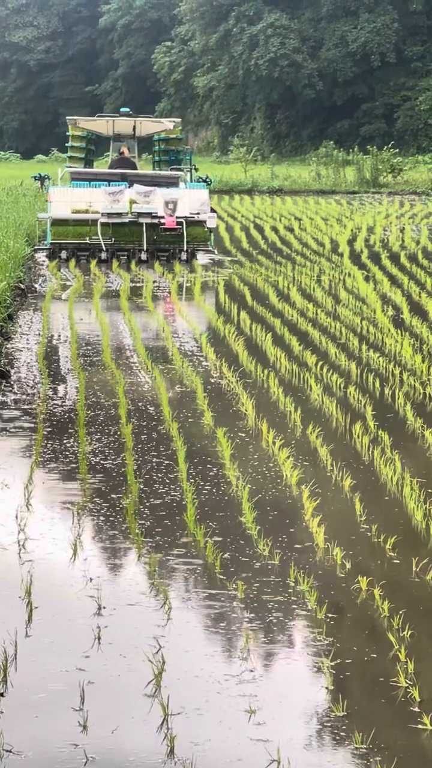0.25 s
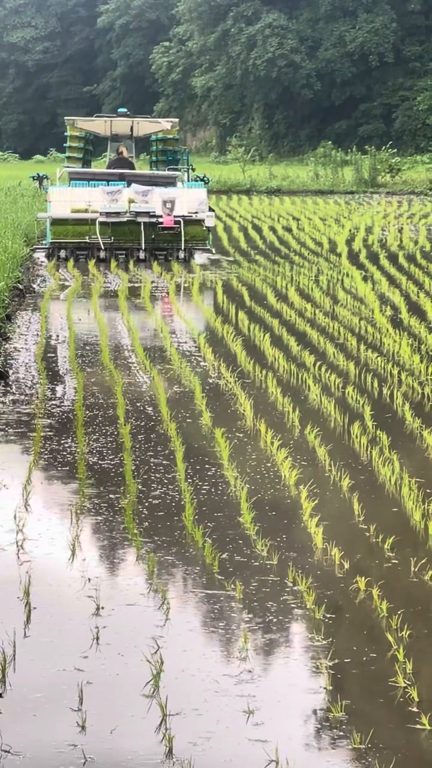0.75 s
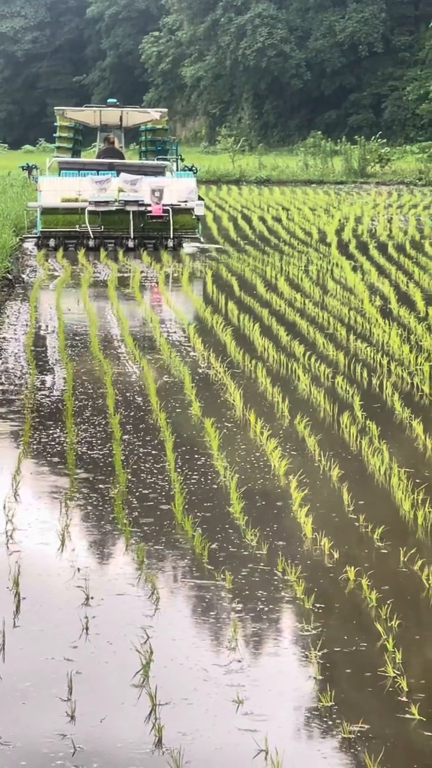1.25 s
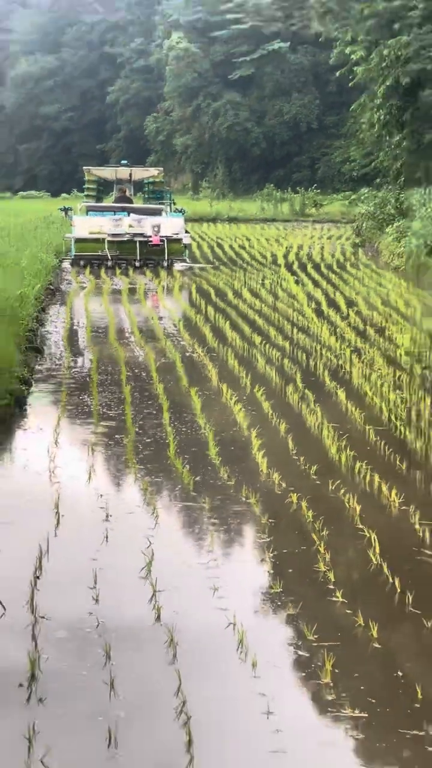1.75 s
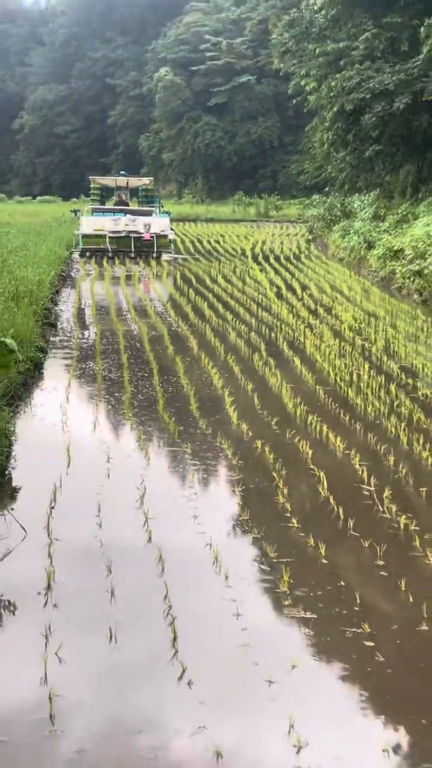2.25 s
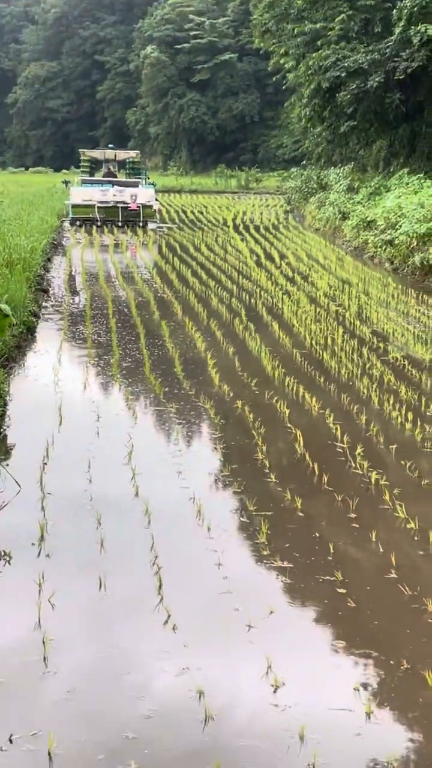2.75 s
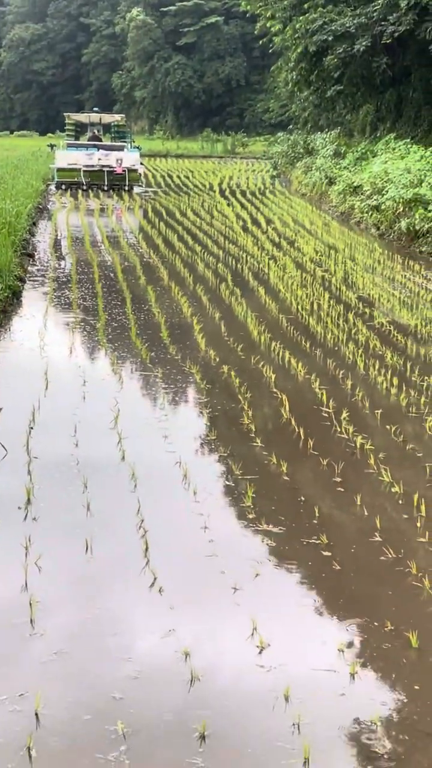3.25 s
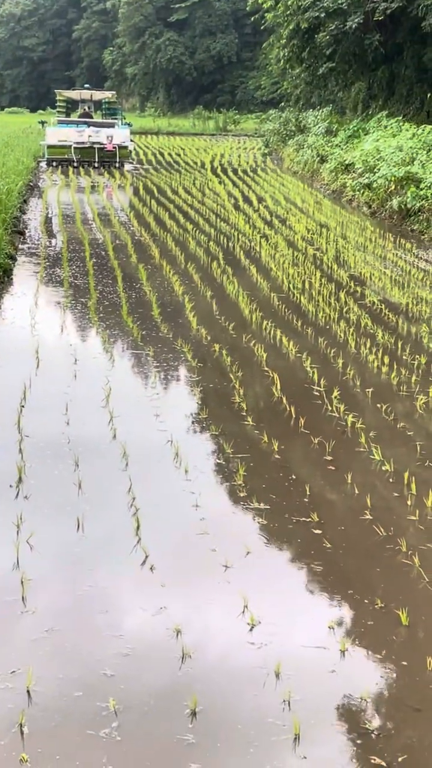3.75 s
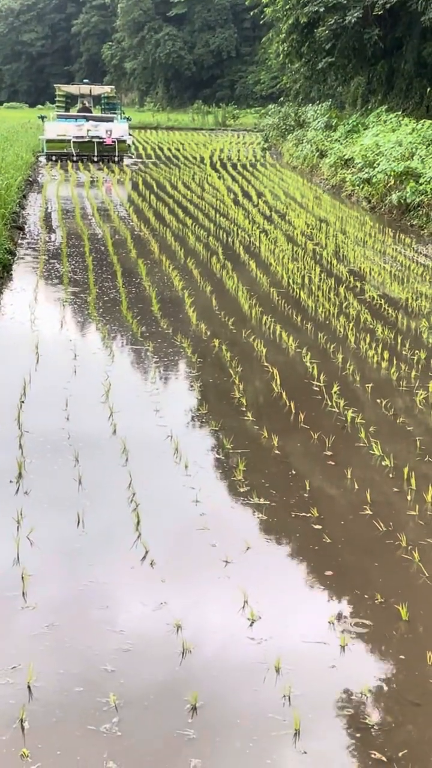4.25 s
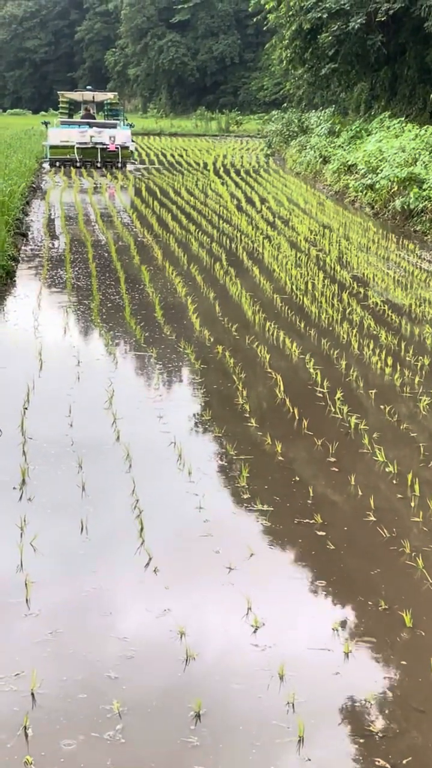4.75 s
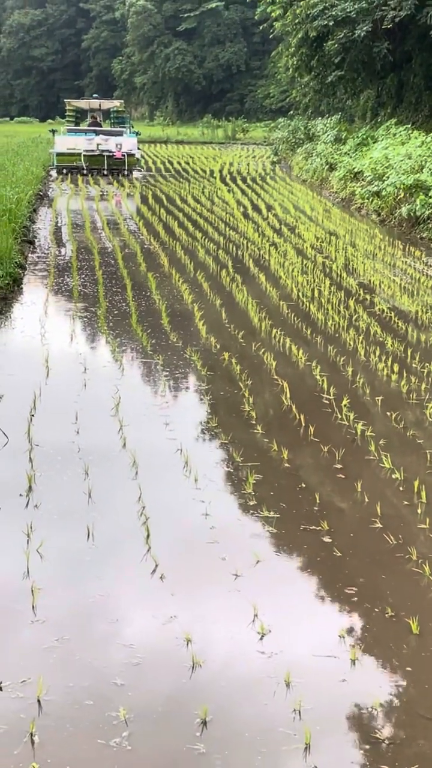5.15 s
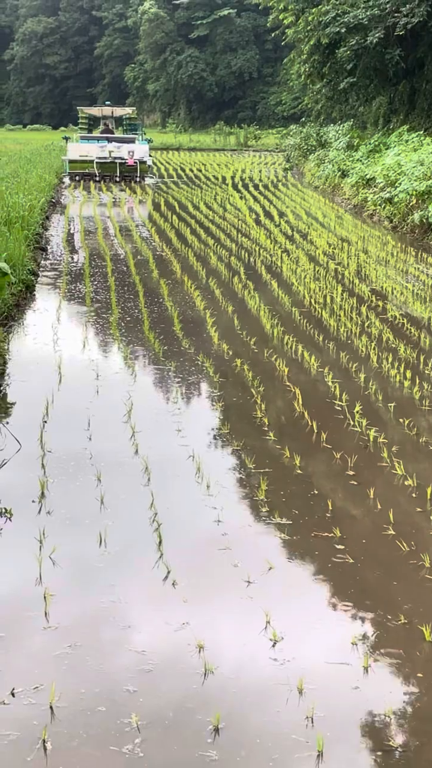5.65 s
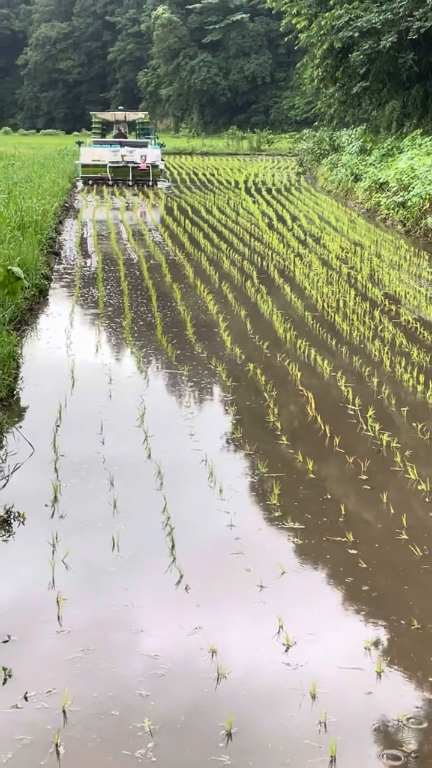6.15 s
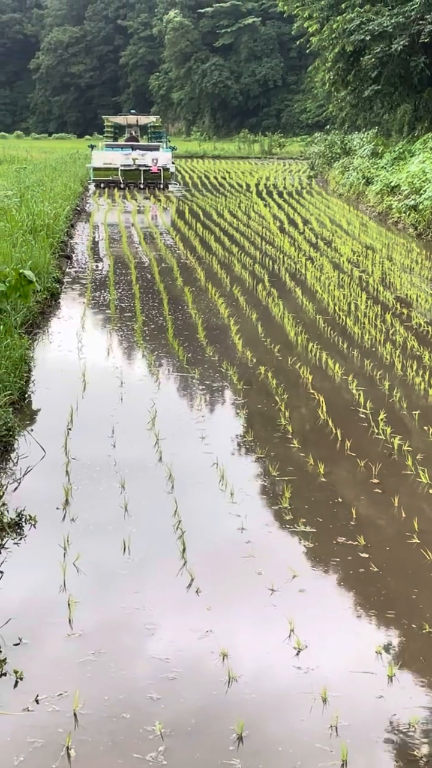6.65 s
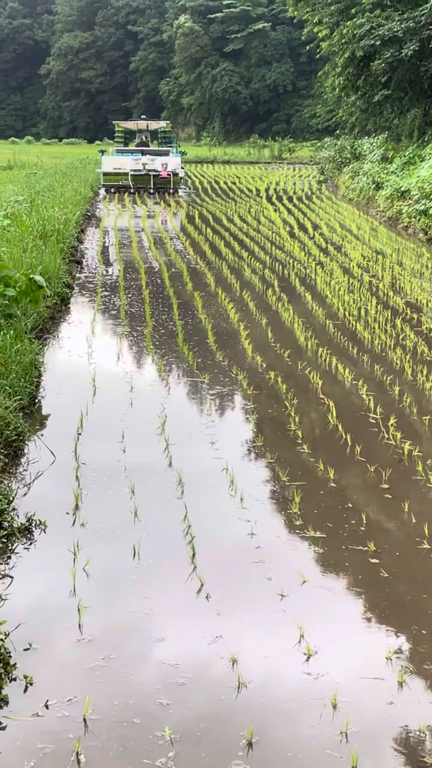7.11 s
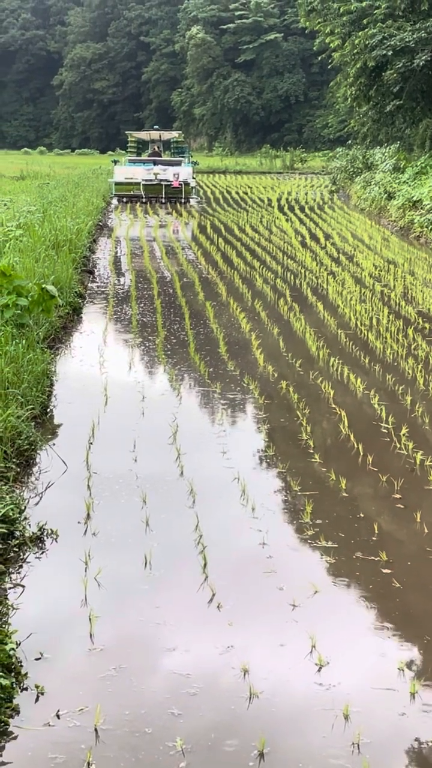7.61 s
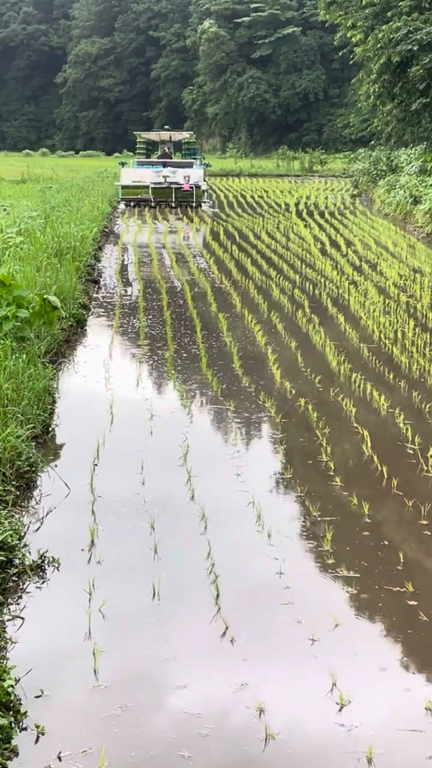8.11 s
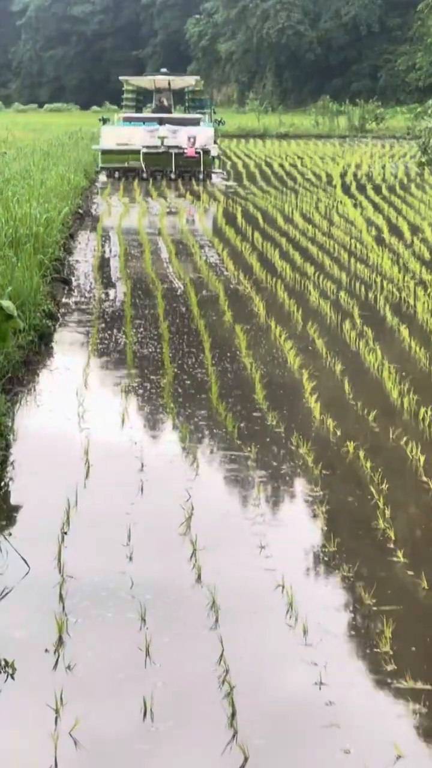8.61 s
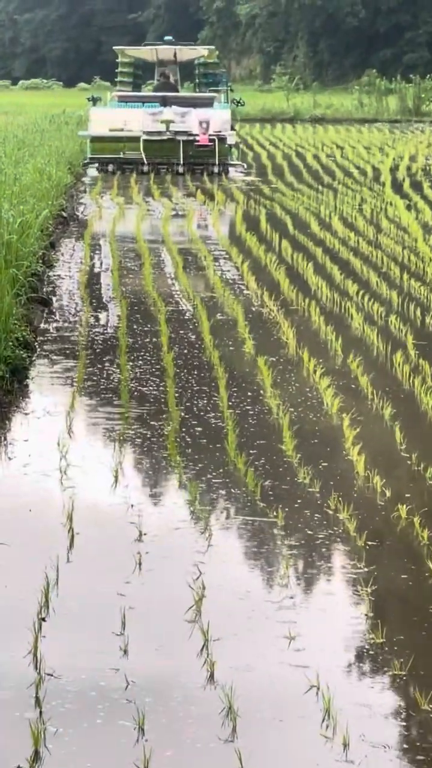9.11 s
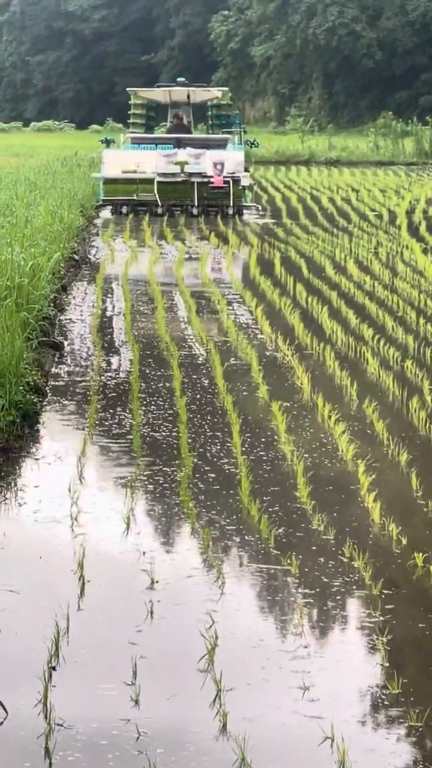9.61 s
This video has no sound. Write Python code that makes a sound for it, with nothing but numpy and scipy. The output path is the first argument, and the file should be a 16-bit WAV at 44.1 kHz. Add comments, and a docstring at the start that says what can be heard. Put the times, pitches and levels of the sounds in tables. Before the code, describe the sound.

A rice planter's diesel engine runs at a steady speed in a flooded field, with a droning exhaust, a rattling panel and a faint gear whine. It is loudest in the first two seconds, then eases off as it moves away, is faintest around 8 seconds and rises slightly at the end. Throughout, light rain hisses on the water, which churns and bubbles, with irregular small slaps of mud and sharp ticks of nearby drips. A bird whistles two quick phrases in the first second, with a slight echo, and returns more faintly between 7 and 8 seconds. The hand-held microphone gives a soft low rumble at the very start and a few fainter ones later. It takes a light knock at about 4.2 seconds, two louder dull knocks at 4.5 and 4.8, and another near 6.5 seconds.

```python
"""Planting rice in light rain

A rice transplanter crawls away through a flooded paddy: its three-cylinder diesel drones, a panel
rattles, gears whine and the planting tines slosh. Rain patters on the water and drips close by, and a
bird whistles from the wood behind the field. A hand-held camera takes a few soft knocks, and its two
microphone openings hear the treble out of step."""
import sys
import numpy as np
from scipy import signal
from scipy.fft import rfft, irfft, next_fast_len
from scipy.io import wavfile
from scipy.ndimage import uniform_filter1d, map_coordinates

SR = 44100
rng = np.random.default_rng(int(sys.argv[2]) if len(sys.argv) > 2 else 0)


def wrap_up_sound(samples):
    """Save the sound to the file named by the first command line argument, as 16-bit audio."""
    columns = np.atleast_2d(samples).T
    # keep every value between -1 and 1, then stretch to whole-number steps
    tamed = np.clip(columns, -1, 1)
    steps = np.round(tamed * 32767).astype(np.int16)
    wavfile.write(sys.argv[1], SR, steps)


N = 435266

# engine speed, sagging and recovering with the drag of the mud: t/s, firing rate/Hz
FIRING_RATE = [(0.05, 60.75), (0.77, 60.66), (1.01, 61.78), (1.43, 62.0), (2.33, 60.83), (3.59, 60.69),
               (3.89, 61.94), (4.07, 61.2), (4.31, 61.97), (4.79, 61.99), (5.15, 61.49), (5.45, 60.75),
               (5.69, 61.86), (6.11, 61.69), (6.41, 60.78), (7.07, 61.8), (7.25, 61.11), (7.43, 61.69),
               (8.81, 61.81), (9.05, 60.65), (9.29, 61.38), (9.77, 61.57)]
# exhaust drone, with three brief swells: t/s, level/dB
DRONE_LEVEL = [(0, -28), (.16, -26), (.26, -32.5), (.68, -35), (.9, -28), (1.0, -28), (1.08, -36),
               (1.65, -35.5), (2.45, -43.5), (3.3, -40), (3.77, -40), (3.92, -43), (4.7, -42), (5.4, -40.5),
               (5.75, -41.5), (5.88, -37), (6.08, -36), (6.16, -39), (7.67, -46.5), (9.05, -46),
               (9.3, -43.5), (9.87, -42.5)]
# throb at the firing rate: t/s, level/dB
THROB_LEVEL = [(0, -52), (.13, -39), (.22, -48), (.42, -52), (.55, -49), (1.2, -47), (1.7, -45), (1.9, -51),
               (2.2, -50), (2.85, -49), (3.55, -55), (4.2, -50), (5.25, -49), (5.4, -54), (6.1, -51),
               (6.75, -55), (7.6, -56), (8.3, -55), (8.6, -52), (9.03, -64), (9.29, -49), (9.45, -56),
               (9.87, -52)]
# how hard the machine works: t/s, exhaust bark/dB, machinery/dB
ENGINE_LOAD = [(0, -45.5, -47.5), (.45, -46.5, -49), (1.85, -48, -47.5), (2.15, -53.5, -49.5),
               (3.8, -54, -50.5), (4.9, -61, -51.5), (6.3, -56, -50.5), (6.85, -60, -53.5), (7.8, -63, -57),
               (8.65, -62.5, -55), (9.2, -57.5, -52.5), (9.87, -55, -50.5)]
# exhaust overtones: multiple of the three-firing cycle's rate, level against the bark/dB
OVERTONES = [(4, -29), (7, -12), (8, -14), (9, -1.5), (12, 0), (14, -10.5), (18, -8.5), (19, -9.5),
             (21, -6)]
# what the silencer lets through: f/Hz, level/dB
SILENCER_SPECTRUM = [(60, -29), (140, 0), (200, -3), (280, 0), (380, -0.5), (440, -4), (500, -8),
                     (620, -17.5), (1200, -19.5), (3000, -78)]
# rattling of a loose panel: t/s, level/dB
RATTLE_LEVEL = [(0, -41), (.4, -62), (1.1, -46.5), (1.85, -48), (2.25, -63), (3.7, -51.5), (4.9, -63),
                (6.3, -53), (6.8, -60), (8.68, -56), (8.83, -50.5), (9.05, -54), (9.55, -51.5), (9.87, -47)]
# tones the panel rings at: f/Hz, level/dB, time to fade by 60 dB/s
PANEL_TONES = [(332, -4, 0.062), (376.7, 0.5, 0.055), (427, -1.5, 0.066)]
# noise of the engine block and gearbox: f/Hz, level/dB
MACHINE_SPECTRUM = [(20, -17), (45, 0.5), (72, 8.5), (98, 5.5), (200, -7), (430, 5.5), (600, -2),
                    (750, 2.5), (1000, 0), (1400, -1), (2000, -11.5), (4000, -19), (16000, -57)]
# whine of the gears as their load shifts: t/s, slow gears/dB, fast gears/dB
WHINE_LEVEL = [(0, -59, -49.5), (.65, -59.5, -50), (1.0, -61.5, -46), (1.7, -62.5, -45.5), (2.05, -62, -51),
               (4, -63, -50.5), (4.9, -64, -53), (6.1, -63, -52.5), (6.5, -63, -50), (7.1, -68, -51.5),
               (7.8, -71, -55), (8.8, -70, -51), (9.87, -68, -50)]
# tones of the slow gears: multiple of the firing rate, level/dB
SLOW_GEAR_TONES = [(10.88, -0.8), (16.3, -2.5), (21.76, -0.5)]
# tones of the fast gears: multiple of the firing rate, level/dB
FAST_GEAR_TONES = [(27.31, -9), (33.05, -15), (44, -17)]
# churning water, with one short lull: t/s, level/dB
CHURN_LEVEL = [(0, -47.5), (3, -49), (7.25, -50), (7.8, -58), (8.2, -53.5), (8.8, -48.5), (9.87, -47.5)]
# water stirred by wheels and tines: f/Hz, level/dB
WASH_SPECTRUM = [(300, -50), (1000, -0.5), (1500, -5), (1800, 3), (2030, 2.5), (2250, 0.8), (2700, -1),
                 (4000, -7.5), (7000, -9), (16000, -67)]
# hiss of the rain: t/s, level/dB
RAIN_LEVEL = [(0, -51.5), (2.9, -49.5), (3.7, -48), (4.7, -52), (6.1, -49.5), (7.4, -51), (7.78, -53),
              (8.15, -48), (9.87, -54.5)]
# rain on water and leaves: f/Hz, level/dB
RAIN_SPECTRUM = [(200, -31), (900, -4.5), (2000, -1), (2900, 4.5), (4000, 2), (4800, -4), (5050, -1.5),
                 (5500, -1.5), (6200, -1.5), (7600, 0.5), (10300, -5), (12000, -5), (13800, -11),
                 (15800, -14)]
# drizzle on nearby grass, lifted by the ringing of the microphone openings: f/Hz, level/dB
DRIZZLE_SPECTRUM = [(4000, -35), (7000, -11.5), (8000, 3.5), (9000, 5.5), (10200, -17.5), (11000, -0.5),
                    (12000, 2), (13000, -8.5), (13800, -7), (15800, -12)]
# the camera shifts in the hand: t/s, half length/s, level/dB
HAND_SHIFTS = [(0.048, .07, -38), (4.6, .06, -52), (5.2, 0.1, -54), (5.98, .1, -53), (7.35, .06, -54),
               (7.88, .04, -53), (8.25, .03, -49), (8.553, 0.098, -49), (9.3, .05, -46)]
# rumble of those shifts: f/Hz, level/dB
RUMBLE_SPECTRUM = [(20, -24), (42, -5), (70, 6), (100, -10), (200, -20), (600, -70)]
# notes of the bird's phrase: t/s within it, length/s, first f/Hz, last f/Hz, level/dB, rasp/share of f
PHRASE_NOTES = [(.015, .095, 2780, 2930, -4.5, .036), (.194, .066, 2660, 2605, 0, .007),
                (.252, .06, 2590, 2560, 1, .014), (.332, .045, 2280, 2170, -1, .022)]
# each time the phrase is sung: t/s, level/dB
PHRASE_STARTS = [(.025, -42), (.427, -42), (7.38, -48.5)]
# single chirps and whistles: t/s, length/s, first f/Hz, last f/Hz, level/dB, rasp/share of f
SINGLE_NOTES = [(.008, .04, 2520, 2300, -38.5, .035), (.13, .1, 2850, 2760, -49.5, .03),
                (7.035, .12, 3725, 3765, -55.5, .006), (7.2, .07, 2830, 2730, -51.5, .009),
                (7.395, .035, 2780, 2860, -47, .01), (7.42, .06, 3040, 3010, -49.5, .006)]
# echo of the trees: f/Hz, time to fade by 60 dB/s
TREE_ECHO = [(200, 0.49), (2500, 0.62), (10000, 0.2)]
# near drops, dry on leaves or ringing in water: t/s, level/dB, f/Hz, fade time/cycles
NEAR_DROPS = [(0.246, -24, 9550, 3), (1.407, -26, 9450, 3), (2.008, -26, 9800, 3), (2.205, -26, 9400, 3),
              (3.3912, -24, 9300, 3), (5.0914, -29, 11100, 3), (5.139, -29, 9700, 3),
              (5.675, -28, 10000, 3), (6.411, -24, 9700, 3.6), (6.961, -42.5, 2460, 14),
              (7.242, -50, 1880, 8.6), (7.432, -29, 9350, 3), (8.155, -41, 1900, 8), (8.53, -25, 9500, 3),
              (8.908, -38.5, 3200, 9), (9.668, -32, 1250, 1.8), (9.669, -37, 1850, 2.8)]
# slaps of muddy water: t/s, level/dB, f/Hz, width/octaves, time to fade by 60 dB/s
MUD_SLAPS = [(0.52, -38, 7500, 0.12, .3), (0.585, -30, 5500, .7, .06), (0.733, -30, 3900, .45, .07),
             (0.805, -28, 1400, 0.79, .1), (0.829, -27, 3900, .35, .05), (1.228, -29, 3500, .3, .05),
             (1.335, -32, 5000, .5, .08), (1.886, -28, 1050, .45, .09), (1.932, -25.5, 5200, 1, .06),
             (2.307, -26, 3600, 0.99, 0.12), (3.174, -29, 3700, 0.72, 0.1), (3.245, -31, 7300, .3, 0.19),
             (3.365, -26.5, 2400, .5, .06), (3.77, -31, 4220, .5, .08), (4.03, -35, 7700, .15, .12),
             (4.158, -27, 5600, 0.77, 0.064), (4.957, -31, 7500, .18, .07), (5.273, -28, 4000, 0.63, .07),
             (6.021, -33, 7300, 0.35, 0.25), (6.498, -26, 7660, .15, 0.048), (6.499, -26, 3400, .2, .03),
             (6.693, -35, 7400, 0.23, .12), (7.189, -30.5, 3100, .45, .07), (7.328, -36, 1150, .5, .06),
             (7.39, -34, 3300, .4, .12), (8.099, -34, 1100, .5, .09), (8.128, -31, 3500, 0.32, .09),
             (8.754, -32, 7800, .25, .04), (8.95, -40, 1870, 0.091, .25), (9.059, -30.5, 4500, 0.58, .08),
             (9.262, -32, 1150, .3, .05), (9.43, -36, 2600, .6, 0.11), (9.818, -33, 4200, 0.64, 0.1)]
# knocks on the camera: t/s, level/dB, f/Hz, swell/s, ring level/dB, ring f/Hz, snap level/dB
CAMERA_KNOCKS = [(4.229, -26.5, 300, 0.0017, -11, 570, -18), (4.534, -13, 264, 0.0046, -16, 497, -17),
                 (4.7523, -11.5, 293, 0.00403, -16.5, 482, -16.5), (6.479, -20, 222, 0.0028, -11, 400, -12),
                 (6.4842, -28, 360, 0.0045, -16, 600, -30), (6.491, -29, 120, .003, -18, 340, -30)]
# how alike left and right sound: f/Hz, likeness (1 = the same)
STEREO_LIKENESS = [(150, 1), (350, .965), (600, .76), (1150, .78), (1700, .98), (4000, .96), (4650, .74),
                   (4950, .35), (5250, .98), (7000, .84), (8700, .93), (9600, 1), (10600, 1), (11600, .85),
                   (13300, .64), (14500, .99)]
# how far the left microphone opening leads the right: f/Hz, phase/radians
LEFT_LEAD = [(5500, 0), (7000, 1.4), (8400, 2.4), (9200, 2.98), (10900, 3.3), (11700, 3.8), (13000, 4.9),
             (14200, 6.2)]

CYLINDERS = 3


def amp(db):
    """Turn decibels into a gain."""
    return 10 ** (np.asarray(db) / 20)


def unit(x):
    """Scale a signal to an average (rms) strength of 1."""
    return x / np.sqrt(np.mean(x ** 2) + 1e-20)


def along(points, hz):
    """Read a table of (f/Hz, value) points on a log frequency axis."""
    f, v = np.transpose(points)
    return np.interp(np.log(hz + 1), np.log(f + 1), v)


def curves(rows):
    """Give one value per sample for each column after the time."""
    times, *columns = np.transpose(rows)
    return [np.interp(np.arange(N) / SR, times, column) for column in columns]


def wobble(rate):
    """A smooth curve through `rate` random values a second."""
    return map_coordinates(rng.standard_normal(int(N * rate / SR) + 4), [np.arange(N) * rate / SR])


def filtered(x, response):
    """Multiply each frequency in x by response(hz)."""
    size = next_fast_len(N + SR // 2)
    return irfft(rfft(x, size) * response(np.fft.rfftfreq(size, 1 / SR)), size)[..., :N]


def coloured(x, spectrum):
    """Shape x with a spectrum table, then scale it to strength 1."""
    return unit(filtered(x, lambda hz: amp(along(spectrum, hz))))


def add(track, start, sound):
    """Mix a sound into a track from `start` seconds on."""
    part = track[..., max(0, round(start * SR)):][..., :sound.shape[-1]]
    part += sound[..., :part.shape[-1]]


def spread(pair):
    """Blend two unrelated signals into the left and right of an open-air sound."""
    turn = lambda hz: np.arccos(np.clip(along(STEREO_LIKENESS, hz), -1, 1)) / 2
    mid, side = filtered(pair, lambda hz: np.array([np.cos(turn(hz)), np.sin(turn(hz))]))
    return np.array([mid + side, mid - side])


def patchy(depth_db):
    """Two noises whose strength drifts in patches of time and pitch."""
    spectra = signal.stft(rng.standard_normal((2, N)), nperseg=512)[2]
    patches = uniform_filter1d(rng.standard_normal(spectra.shape[1:]), size=12, axis=0)
    patches = unit(uniform_filter1d(patches, size=7, axis=1))
    return unit(signal.istft(spectra * amp(depth_db * patches), nperseg=512)[1][:, :N])


def patter(count, low_hz, high_hz, cycles, scatter_db, size=192):
    """Two unrelated streams of tiny impacts, each a quickly fading tone."""
    when, pitch, luck = rng.random((count, 3)).T[:, :, None]
    hz = low_hz * (high_hz / low_hz) ** pitch
    n = np.arange(size)
    turns = hz * n / SR
    strength = amp(-scatter_db * np.log(luck + 0.012)) * np.sqrt(hz)
    grains = strength * np.sin(2 * np.pi * turns) * np.exp(-turns / cycles)
    places = (when * 2 * N).astype(int) + n
    stream = np.bincount(places.ravel(), grains.ravel(), 2 * N)
    return unit(stream[:2 * N].reshape(2, N))


def kicks(firings, level_db, jitter_s):
    """One click for each engine firing, a little early or late."""
    late = (jitter_s * SR * rng.standard_normal(len(firings))).astype(int)
    return np.bincount(np.clip(firings + late, 0, N - 1), amp(level_db), N)


def exhaust(fired, firings, bark_db, weak_db=-4, roughness=1.23, lag_radians=0.26):
    """Three cylinders fire in turn: a clean drone, and a ragged bark through the silencer."""
    angle = 2 * np.pi * fired
    # the pipe rings at twice the firing rate
    drone = amp(curves(DRONE_LEVEL)[0] + 0.56 * wobble(18)) * np.cos(2 * angle)
    throb = amp(curves(THROB_LEVEL)[0] + 0.6 * wobble(9)) * np.cos(angle)
    cycle = (angle - lag_radians) / CYLINDERS
    overtones = sum(amp(bark_db + db + 1.43 * wobble(7)) * np.cos(k * cycle) for k, db in OVERTONES)
    weak = np.arange(len(firings)) % CYLINDERS == 0  # one cylinder pulls less
    puffs = unit(kicks(firings, weak_db * weak, jitter_s=0.00045)) * np.array([[1], [0]])  # centred
    # swirling gas rides on both crests of the pipe's wave
    gas = unit(np.abs(np.cos(angle)) ** 2.2 * rng.standard_normal((2, N)))
    bark = spread(coloured(puffs + roughness * gas, SILENCER_SPECTRUM))
    return np.sqrt(2) * (drone + throb + overtones) + amp(bark_db + 0.5) * bark


def rattle(firings, uneven_db=5, attack_s=0.002):
    """Every firing jolts a loose panel, now lightly, now hard."""
    out, t = np.zeros(N), np.arange(SR // 8) / SR
    for hz, db, fade_s in PANEL_TONES:
        jolt_db = uneven_db * np.tanh(rng.standard_normal(len(firings)))
        jolts = kicks(firings, jolt_db, jitter_s=0.001384)
        envelope = amp(db - 60 * t / fade_s) * (1 - np.exp(-t / attack_s))
        out += signal.fftconvolve(jolts, envelope * np.sin(2 * np.pi * hz * t))[:N]
    return amp(curves(RATTLE_LEVEL)[0]) * unit(out)


def machinery(machine_db, clatter=0.2):
    """The engine block makes a rough noise and the planting arms clatter."""
    ticks = patter(count=9000, low_hz=590, high_hz=2620, cycles=1.7, scatter_db=1.5)
    noise = coloured(patchy(depth_db=1.6) + clatter * ticks, MACHINE_SPECTRUM)
    return amp(machine_db + 1.5 + 0.17 * wobble(13)) * spread(noise)


def gears(fired, waver_db=2, flutter_db=2):
    """Gear teeth sing at set multiples of the engine's speed; slack between them makes it flutter."""
    out = np.zeros(N)
    for whine_db, tones in zip(curves(WHINE_LEVEL), (SLOW_GEAR_TONES, FAST_GEAR_TONES)):
        for multiple, db in tones:
            gain = amp(whine_db + db + waver_db * wobble(3.6) + flutter_db * wobble(20))
            slack = 0.62 * wobble(20)
            out += gain * np.sin(2 * np.pi * multiple * fired + slack)
    return out


def wash(bubbles=0.28):
    """Wheels and tines churn the flooded mud into a lapping, fizzy wash."""
    fizz = patter(count=12000, low_hz=1480, high_hz=4800, cycles=3.0, scatter_db=3)
    water = spread(coloured(patchy(depth_db=1.55) + bubbles * fizz, WASH_SPECTRUM))
    return amp(curves(CHURN_LEVEL)[0] - 0.5 + 0.65 * wobble(25)) * water


def plops(against_churn_db=-12.5):
    """Larger bubbles ring in the churned water, a few loud enough to stand out."""
    bubbles = patter(count=1100, low_hz=950, high_hz=5000, cycles=8, scatter_db=2.7, size=1500)
    return amp(curves(CHURN_LEVEL)[0] + against_churn_db) * spread(bubbles)


def rain(prickle=0.41, flurry_db=0.1, flutter_db=0.67):
    """Far drops merge into a hiss, nearer ones prickle; both come in small flurries."""
    near = patter(count=16000, low_hz=4160, high_hz=15400, cycles=3.4, scatter_db=4.5)
    hiss = spread(coloured(patchy(depth_db=2.0) + prickle * near, RAIN_SPECTRUM))
    return amp(curves(RAIN_LEVEL)[0] + 2.0 + flurry_db * wobble(7.2) + flutter_db * wobble(36)) * hiss


def drizzle(level_db=-54.5, flutter_db=1.0, prickle=0.45):
    """The finest drops keep up a thin, steady sizzle."""
    specks = patter(count=9000, low_hz=7500, high_hz=13000, cycles=3.5, scatter_db=3)
    sizzle = spread(coloured(patchy(depth_db=1.9) + prickle * specks, DRIZZLE_SPECTRUM))
    return amp(level_db + flutter_db * wobble(20)) * sizzle


def handling():
    """The hand shifts on the camera with soft, low rumbles."""
    t = np.arange(N) / SR
    force = sum(amp(db) * np.exp(-.5 * ((t - when) / half) ** 2) for when, half, db in HAND_SHIFTS)
    return force * coloured(rng.standard_normal(N), RUMBLE_SPECTRUM)


def bird_note(length, first_hz, last_hz, rasp, attack_s=0.012, release_s=0.026):
    """One note starts crisply, glides and fades; a fast shake in pitch makes it raspy."""
    t = np.arange(int(length * SR)) / SR
    hz = np.linspace(first_hz, last_hz, len(t)) * (1 + rasp * wobble(213.6)[:len(t)])
    envelope = np.clip(np.minimum(t / attack_s, (length - t) / release_s), 0, 1)
    return envelope * np.sin(2 * np.pi * np.cumsum(hz) / SR)


def bird(echo_db=-7.5):
    """A bird sings a four-note phrase three times, plus single chirps; the trees echo them."""
    out = np.zeros(N)
    sung = [(start + offset, length, first_hz, last_hz, phrase_db + db, rasp)
            for start, phrase_db in PHRASE_STARTS
            for offset, length, first_hz, last_hz, db, rasp in PHRASE_NOTES]
    for start, length, first_hz, last_hz, db, rasp in sung + SINGLE_NOTES:
        add(out, start, amp(db) * bird_note(length, first_hz, last_hz, rasp))
    hz, t, spectra = signal.stft(rng.standard_normal(SR // 2), SR, nperseg=256)
    fade = amp(-60 * t / along(TREE_ECHO, hz)[:, None])
    tail = signal.istft(spectra * fade, SR, nperseg=256)[1]
    return out + amp(echo_db) * signal.fftconvolve(out, tail / np.linalg.norm(tail))[:N]


def drips(crack=0.12, crack_fade_s=0.0054):
    """Single drops land close by: a crack and a few cycles of ringing."""
    out, t = np.zeros(N), np.arange(SR // 40) / SR
    for start, db, hz, cycles in NEAR_DROPS:
        ring = np.sin(2 * np.pi * hz * t) * np.exp(-hz * t / cycles)
        splat = uniform_filter1d(rng.standard_normal(len(t)), size=2) * amp(-60 * t / crack_fade_s)
        add(out, start, amp(db + 5) * (ring + crack * splat))
    return out


def sloshes(rise_s=0.0016):
    """Mud and water slap: each time a short burst of spray around one pitch."""
    out, t = np.zeros((2, N)), np.arange(SR // 4) / SR
    hz = np.fft.rfftfreq(len(t), 1 / SR) + 1
    for start, db, centre_hz, octaves, fade_s in MUD_SLAPS:
        band = np.exp(-.5 * (np.log2(hz / centre_hz) / octaves) ** 2)
        spray = unit(irfft(rfft(rng.standard_normal((2, len(t)))) * band, len(t)))
        envelope = amp(db - 10.5 - 60 * t / fade_s) * (1 - np.exp(-t / rise_s))
        add(out, start - .002, spray * envelope)
    return spread(out)


def knocks(sink_s=0.036, release_s=0.0036, ring_s=0.0039, snap_hz=560, snap_s=0.0021):
    """The camera body is knocked: a small snap, then a thud that sinks in pitch, with a hollow ring."""
    out, t = np.zeros(N), np.arange(-SR // 50, SR // 50) / SR  # t = 0 at the thud's peak
    for when, db, hz, swell_s, ring_db, ring_hz, snap_db in CAMERA_KNOCKS:
        angle = 2 * np.pi * hz * sink_s * (1 - np.exp(-t / sink_s))
        thud = -np.exp(-(t / np.where(t < 0, swell_s, release_s)) ** 2) * np.cos(angle)
        ring = np.exp(-(t / ring_s) ** 2) * np.sin(2 * np.pi * ring_hz * t)
        snap_t = t + 1.49 * swell_s
        snap = -np.exp(-(snap_t / snap_s) ** 2) * np.cos(2 * np.pi * snap_hz * snap_t)
        add(out, when + t[0], amp(db) * (thud + amp(ring_db) * ring + amp(snap_db) * snap))
    return out


def scene():
    """The engine's speed drives exhaust, panel and gears; water, rain and bird surround them."""
    fired = np.cumsum(curves(FIRING_RATE)[0]) / SR  # running count of firings
    firings = np.flatnonzero(np.diff(np.floor(fired)))  # samples at which a cylinder fires
    bark_db, machine_db = curves(ENGINE_LOAD)
    transplanter = exhaust(fired, firings, bark_db) + rattle(firings) + machinery(machine_db)
    steady = transplanter + gears(fired) + wash() + plops() + rain() + drizzle()
    return steady + handling() + bird() + drips() + sloshes() + knocks()


def record(dry, top_hz=15850):
    """The two microphone openings hear the treble out of step; nothing above top_hz gets through."""
    shift = lambda hz: np.exp(np.array([[.5j], [-.5j]]) * along(LEFT_LEAD, hz))
    return filtered(dry, lambda hz: shift(hz) * (hz < top_hz))


dry = scene()
out = record(dry)
wrap_up_sound(out)
```